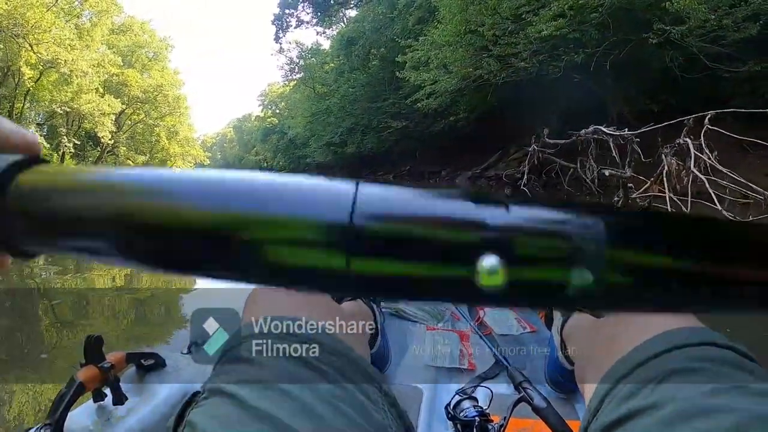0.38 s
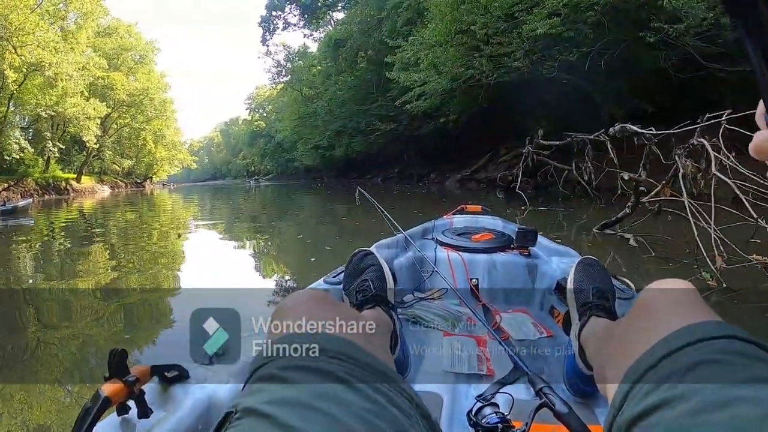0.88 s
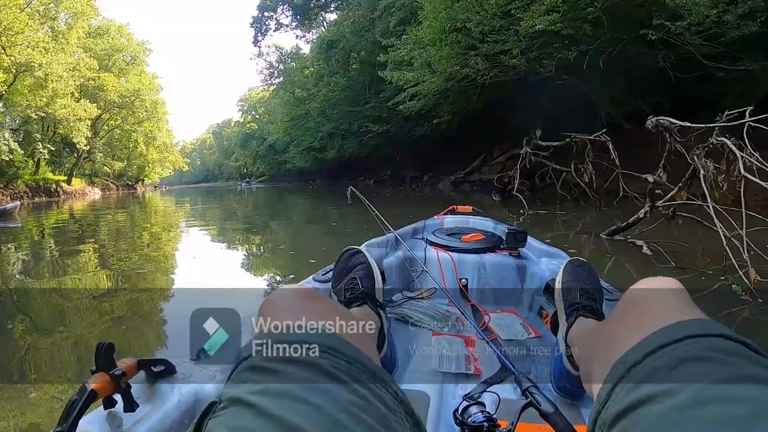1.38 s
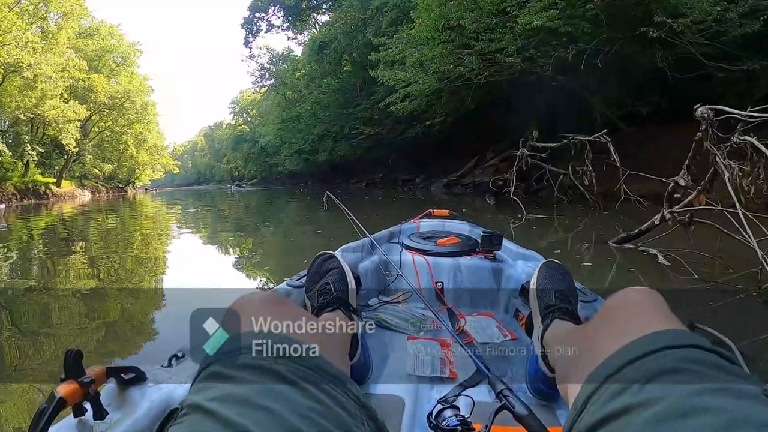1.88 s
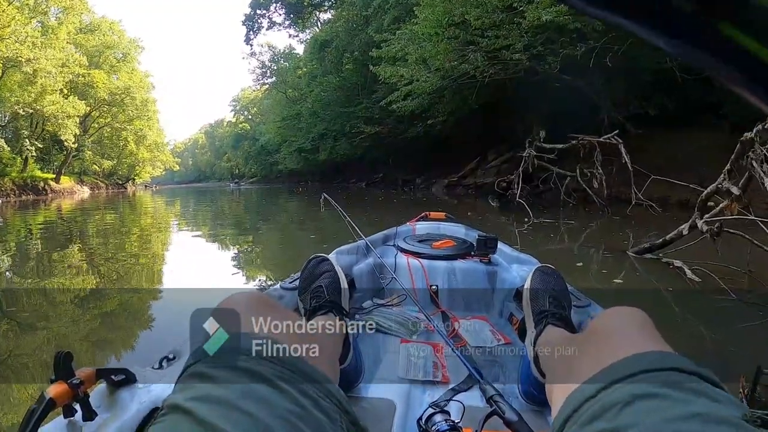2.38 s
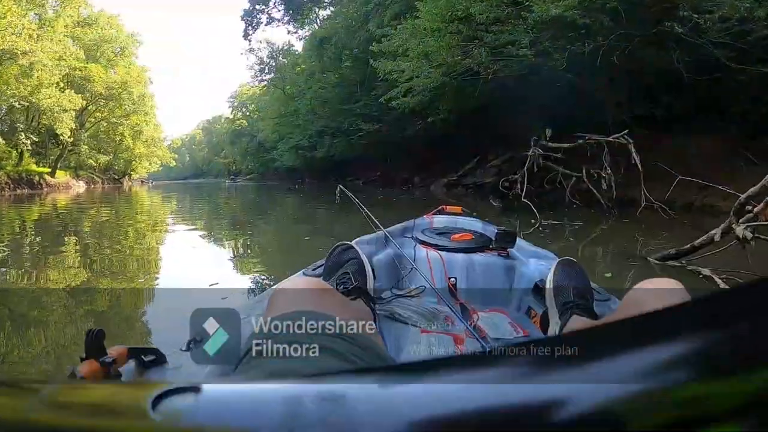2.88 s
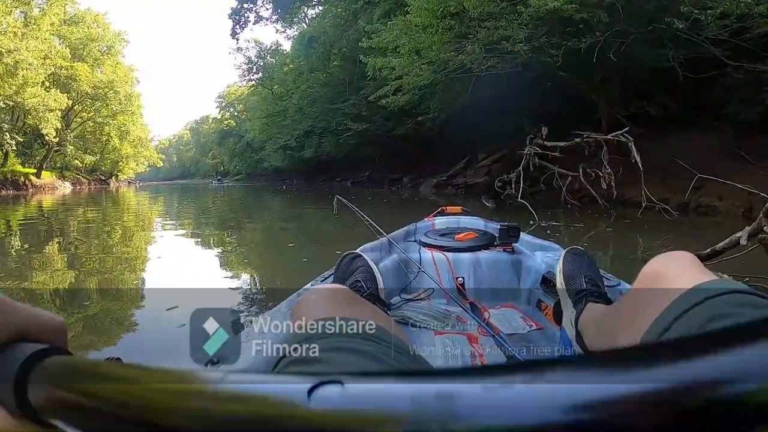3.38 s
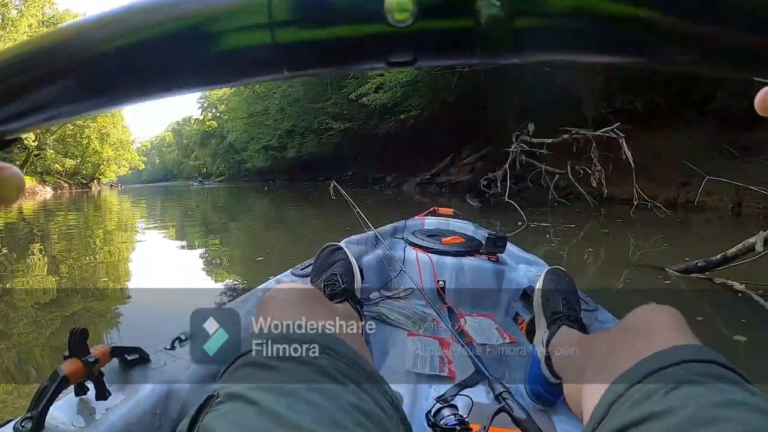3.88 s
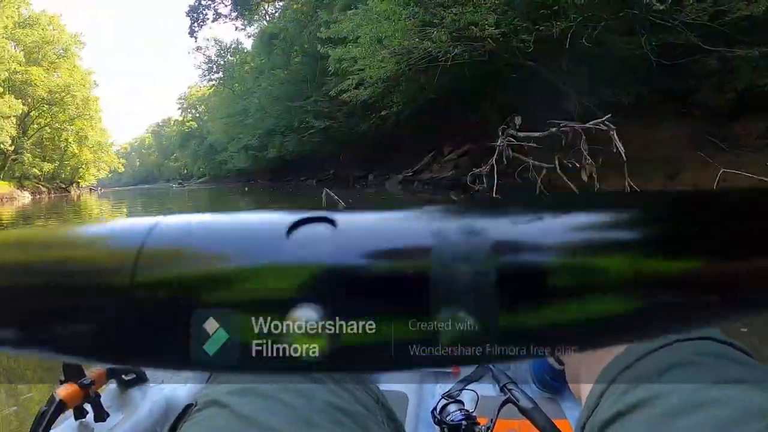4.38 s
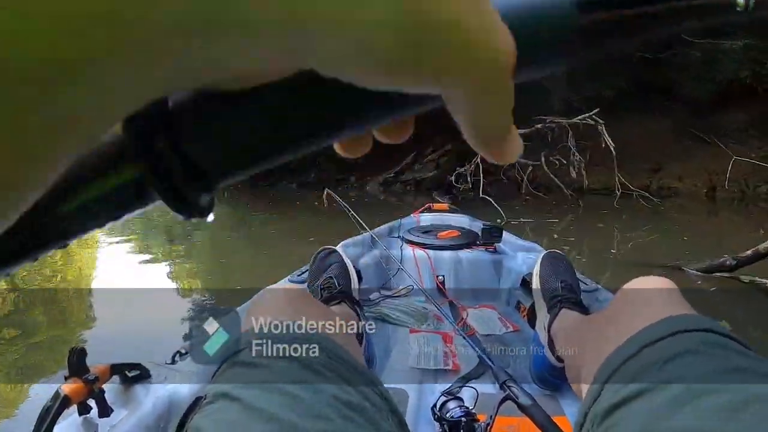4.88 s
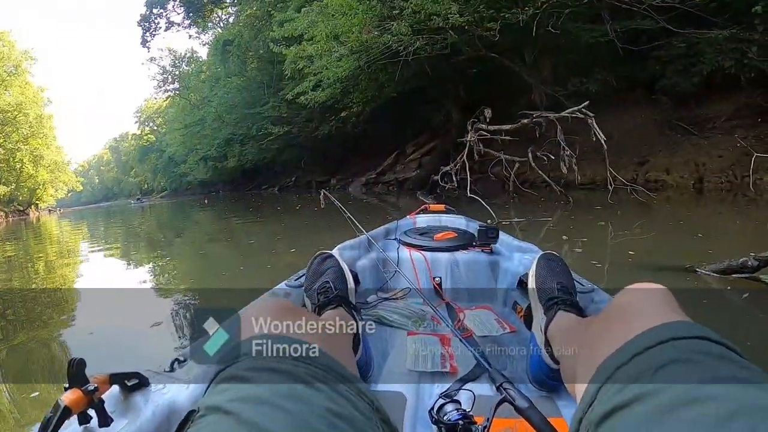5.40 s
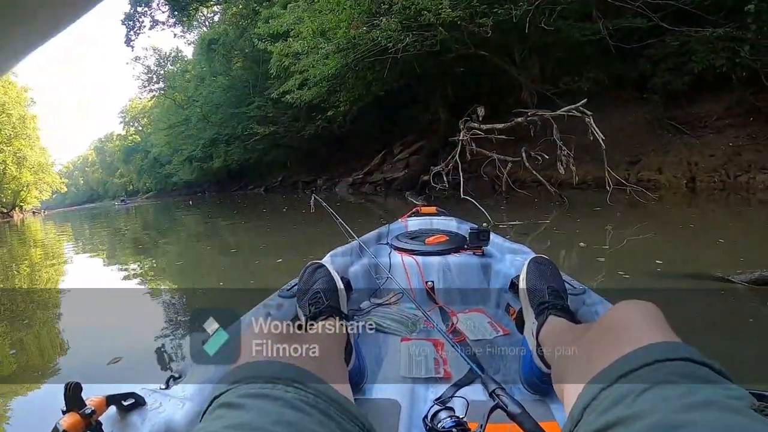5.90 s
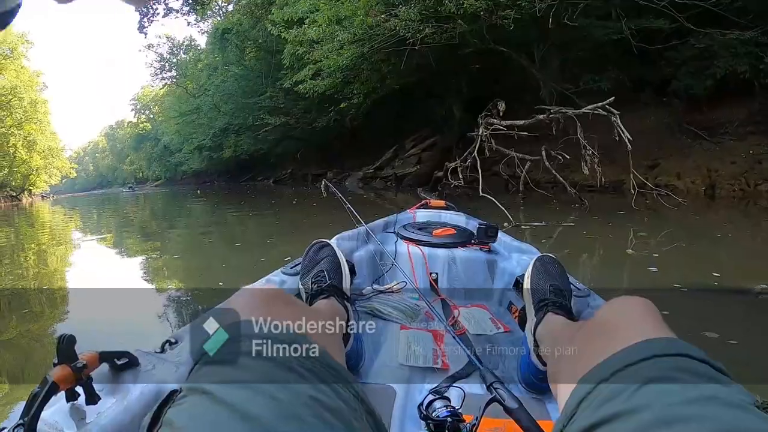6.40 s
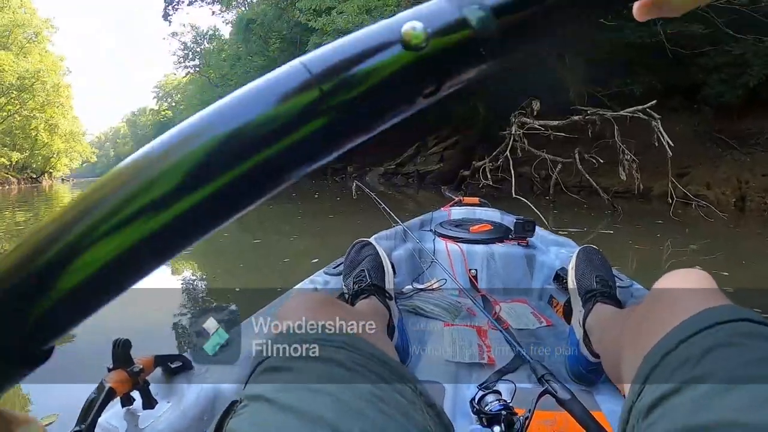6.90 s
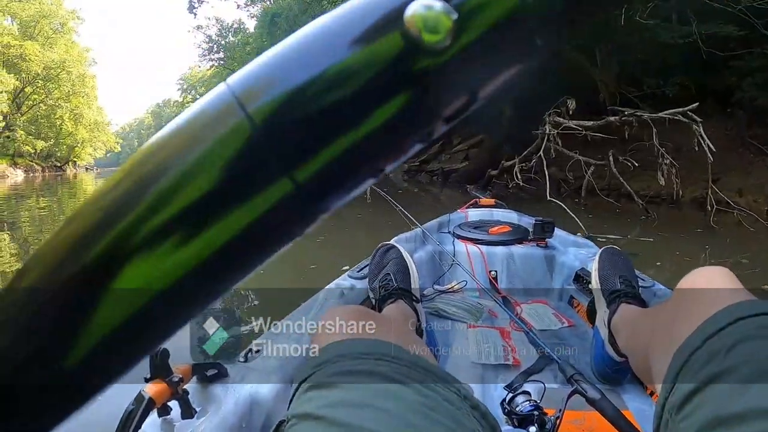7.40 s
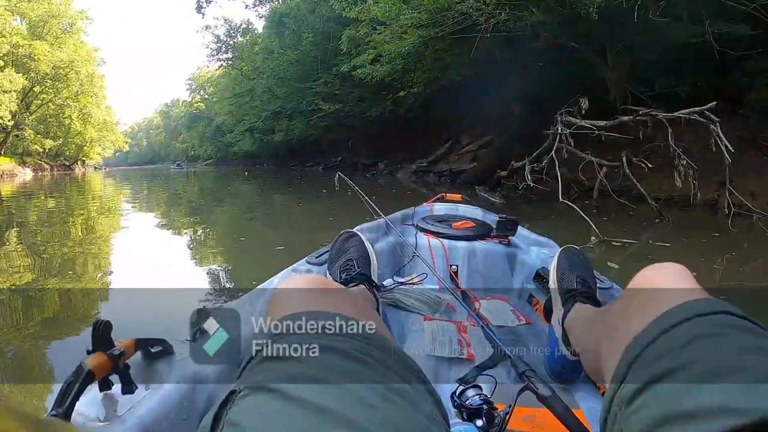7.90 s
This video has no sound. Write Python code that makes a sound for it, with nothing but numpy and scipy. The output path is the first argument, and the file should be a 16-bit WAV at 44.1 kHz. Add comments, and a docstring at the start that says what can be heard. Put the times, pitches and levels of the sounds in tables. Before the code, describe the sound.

Close stereo from a paddler's chest on a quiet river. At first there is slight cloth rustle, low water drumming and smooth insect hiss leaning left. From 1 to 2.5 s come light hull taps, soft low thumps, clear bubble plops and growing gurgles. At 2.7 s a loud hollow plastic knock lands with a swell of water, then a rapid clatter with short gritty scrapes from 3.0 to 3.5 s. Another dense burst of knocks and drags hits at 3.9-4.1 s, with rustling cloth. It calms; faint hoarse crows call around 4.5 and 5.6-6.5 s, and tiny high bird chips recur throughout. A single strong bang with a deep thump comes at 5.3 s, with tiny ticks after. At 7.1-7.3 s boomy knocks thud to the left, with a bubble; the insects drop lower, and drips and light gurgles run from 7.7 s to the end at 8 s.

```python
"""Plastic kayak on a quiet river

Heard from the paddler's chest. The shaft knocks, thumps and drags on the hull: blows and stick-slip clicks
ring decaying modes. Water gurgles, plops and fizzes as gliding bubble sines; small bumps drum the hull.
Low noise shudders with the boat, and crackling noise is the rustle of cloth.
Behind: an insect chorus of shaped noise, a small bird's pitch-swept chips and crows of fuzzy tones."""
import sys
import numpy as np
from scipy import signal
from scipy.fft import rfft
from scipy.io import wavfile
from scipy.ndimage import uniform_filter1d, map_coordinates

SR = 44100
rng = np.random.default_rng(int(sys.argv[2]) if len(sys.argv) > 2 else 0)


def attenuation_scalar(level_db):
    """Turn a level in dB into a linear amplitude multiplier (20 dB per decade)."""
    decades = np.asarray(level_db, float) / 20
    return 10 ** decades


def persist_wave(psi):
    """Save psi, clipped to +-1, as 16-bit WAV."""
    counts = np.round(np.clip(psi, -1, 1) * 32767).astype(np.int16)
    wavfile.write(sys.argv[1], SR, np.atleast_2d(counts).T)


N = 353682
T = np.arange(N) / SR  # [s]

# Hull modes: (frequency [Hz], relative level [dB], t60 before damping [s])
HULL_MODES = [(60, -10, .2), (88.4, 0, 0.27), (114.6, -3.5, 0.16), (148.6, -3.5, 0.3), (186, 6, 0.16),
              (207.2, 3.5, 0.19), (236.5, 2.5, 0.28), (264.9, 6, 0.14), (307.2, 3, 0.16), (365, 4.5, 0.13),
              (453, 4.5, 0.14), (522, -2.5, 0.14), (615.4, -2, 0.16), (720, 5.5, 0.065), (782, 3.5, 0.075),
              (975, 7.5, 0.073), (1110, 11, 0.044), (1312, 4, 0.087), (1505, 12.5, 0.02), (1752, 8, 0.047),
              (1980, 6.5, 0.043), (2214, 4, 0.051), (2412, 4.5, 0.067), (2820, 16, 0.016),
              (3150, 6.5, 0.057), (3550, 14.5, 0.034), (4110, 16, 0.046), (4540, -11, .025)]
# Hard blows of the shaft: (time [s], peak [dB], most excited frequency [Hz], tick over the blow [dB],
# spread [octaves])
KNOCKS = [(.127, -20.5, 627, -35, 0.89), (.987, -24, 580, -22, 1.5), (1.212, -28.5, 970, -18, 0.53),
          (1.487, -25.5, 684, 1.5, 1.6), (1.819, -23.5, 930, -30, 0.56), (2.009, -15.5, 1770, -28, 0.43),
          (2.234, -16, 560, -37, 0.63), (2.256, -6, 1240, -36, 0.78), (2.498, -13.5, 900, -25, 1.4),
          (2.709, -0.5, 748, -40, 1.23), (2.7113, -2.5, 1920, -30, 0.6), (2.738, -12, 1020, -30, 0.79),
          (2.899, -26, 3000, -8, 1.1), (2.983, -22, 596, -30, 0.62), (3.033, -17, 900, -30, .6),
          (3.042, -0.5, 1020, -30.5, 1), (3.069, -2.5, 730, -29.5, 0.78), (3.11, -7, 965, -35, 0.64),
          (3.141, -15.5, 1500, -19, 1.3), (3.145, -18, 3500, -21, .4), (3.353, -22, 1230, -18, 1.5),
          (3.367, -9.5, 714, -35, 1.3), (3.417, -4.5, 670, -33, 1.15), (3.453, -9.5, 920, -31, 0.73),
          (3.478, -5.5, 780, -31, 0.84), (3.872, -17.5, 1070, -16, 1.8), (3.923, -22, 985, -29, 1.2),
          (3.943, -10, 1390, -33, 1.8), (3.948, -9, 4300, -30, 0.18), (3.964, 1.5, 1040, -25, 1.25),
          (3.968, -6.5, 2400, -25, .9), (4.0, -8, 1300, -26, 1.2), (4.029, -6.5, 614, -3.5, 1.8),
          (4.059, -9, 693, -30, 1.6), (4.081, -3, 603, -28, 1.46), (4.088, -3, 524, -32, 0.6),
          (4.734, -30.5, 519, -10, 0.96), (4.992, -23.5, 2580, -6.5, 1.8), (5.278, -1, 860, -14, 0.78),
          (5.2778, -0.5, 2060, -39.5, 0.38), (5.333, -18.5, 594, -14, 1.6), (5.578, -28, 2900, -12, 1.8),
          (5.867, -33, 1380, -15, 1.2), (6.292, -20, 820, -3.5, 1.8), (6.648, -31, 1050, -19, 0.67),
          (6.683, -23.5, 2660, -8, 0.66), (7.003, -28.5, 988, -1.5, 1.2), (7.108, -20.5, 900, -20, 1.3),
          (7.118, -2, 1010, -15.5, .96), (7.15, -24.5, 576, -16, 1.8), (7.185, -11, 649, -28, 1.08),
          (7.226, -18.5, 800, -32, 1.4), (7.289, -22.5, 501, -29, 1.6), (7.481, -23.5, 504, -28, 1.9)]
# Soft, deep blows: (time [s], peak [dB], most excited frequency [Hz], spread [octaves])
THUMPS = [(1.211, -23, 335, .32), (1.497, -15.5, 186, 0.28), (1.519, -16.5, 217, 0.51),
          (1.567, -16, 202, 0.43), (1.668, -25, 242, 0.23), (1.7, -15.5, 244, 0.11),
          (1.805, -15, 241, 0.11), (2.182, -16, 223, 0.31), (2.329, -11.5, 194, 0.21),
          (2.349, -14, 206, 0.13), (2.714, -23, 151, .13), (2.716, -12, 327, .39), (2.734, -8, 178, 0.1),
          (2.759, -1.5, 194, 0.45), (2.79, -6.5, 160, 0.25), (2.958, -14.5, 334, 0.29),
          (3.066, -13.5, 280, 0.12), (3.376, -15, 263, 0.094), (3.515, -18.5, 261, 0.12),
          (3.982, -13.5, 150, 0.11), (4.03, -10.5, 142, 0.2), (4.063, -14, 303, .33), (4.08, -8, 414, 0.41),
          (4.113, -20.5, 91.5, 0.43), (4.761, -27, 186, 0.09), (5.281, 0, 192, .37),
          (5.282, -9.5, 365, 0.21), (5.3, -15, 187, 0.27), (5.333, -16.5, 120, 0.22),
          (5.573, -19.5, 96, 0.45), (5.585, -24.5, 272, 0.46), (6.295, -24, 167, 0.24),
          (6.401, -23, 194, 0.49), (7.107, -12, 210, 0.082), (7.12, .5, 184, 0.12), (7.15, -6.5, 255, 0.51),
          (7.187, 0.5, 199, 0.09), (7.212, -4, 175, .2), (7.286, -8, 159, 0.5), (7.588, -28.5, 333, 0.2),
          (7.995, -24.5, 312, 0.15)]
# Shaft dragging over the hull: (start [s], length [s], relative level [dB],
# first brightness, last brightness [octaves above the dullest spot])
DRAGS = [(3.04, 0.068, -20, 2, 0.54), (3.119, 0.053, -26.5, 0.46, 1.2), (3.272, .06, -34, 1.6, 1.8),
         (3.364, 0.027, -16.5, 0.91, 0.51), (3.438, .09, -19.5, 1.4, 0.85), (3.62, .13, -30, 0.47, 1.3),
         (3.941, .035, -16, 2.1, 1.5), (3.982, 0.056, -11, 0.84, 0.35), (4.043, 0.044, -14, 0.63, 0.78)]
# Single bubbles: (time [s], level [dB], starting pitch [Hz], t60 [s], rough initial rise [octaves/s])
PLOPS = [(1.047, -2.5, 1210, 0.017, 4), (1.304, -14.5, 1194, 0.044, 2.9), (1.342, -15.5, 490, 0.04, 4),
         (1.406, -25.5, 1170, 0.053, 4), (1.448, -18.5, 458, 0.034, 4), (1.515, -20.5, 740, 0.048, 3.3),
         (1.724, -11, 894, 0.026, 3.5), (1.751, 0, 610, 0.015, 4), (1.978, -22.5, 956, 0.093, 3.9),
         (2.885, -32, 970, 0.04, 4), (6.493, -27, 1135, 0.035, 4), (6.954, -30.5, 990, 0.035, 4),
         (7.765, -9, 990, 0.023, 4), (7.797, -15, 996, 0.032, 4), (7.817, -12, 1084, 0.037, 4),
         (7.9, -19, 1020, 0.044, 3.6), (7.916, -21, 1580, 0.041, 3.1), (1.104, -22, 736, 0.13, 21),
         (1.359, -25.5, 558, 0.11, 18), (2.564, -32, 468, 0.12, 36), (7.233, -5.5, 727, 0.065, 29),
         (7.687, -22.5, 975, 0.07, 18), (7.829, -19.5, 485, 0.1, 16.4), (1.0251, -22, 3150, 0.022, 14),
         (1.1467, -16, 3750, 0.018, 8), (1.276, -23.5, 3550, 0.032, 8), (1.5404, -24.5, 1980, 0.045, 10),
         (1.9624, -23, 1650, 0.019, 8), (2.5132, -18, 2780, 0.039, 9.1), (7.7273, -27, 1610, 0.019, 9.7),
         (7.95, -23, 2050, 0.022, 7.2)]
# Surges of water round the blade: (peak time [s], gurgle level [dB], swell [s], fade [s],
# depth [0 surface - 1 against the hull])
SURGES = [(.06, -41, 0.39, 0.3, 0.69), (.3, -48.5, 0.62, 1.44, 0.91), (1.1, -33.5, 0.32, 0.37, 0.38),
          (1.45, -36.5, 0.45, 1.2, 0.34), (1.8, -29, 0.23, 0.6, 0.5), (2.0, -34, 0.4, 0.095, 0.64),
          (2.25, -30, 0.19, .3, 0.53), (2.53, -34, 0.18, .4, .03), (2.62, -23.5, 0.11, 0.3, 0.082),
          (2.701, -22, 0.31, 0.027, 0.16), (2.729, -20.5, .03, .11, 0.68), (2.971, -29, 0.2, 0.24, 0.39),
          (3.57, -43.5, 0.64, 0.3, 0.76), (6.45, -53, 0.3, 0.23, 0.54), (7.2, -33, 0.12, .16, 0.82),
          (7.47, -43, 0.25, 1.1, 0.33), (7.76, -33, 0.17, 0.59, 0.17), (8.02, -34, 0.43, .5, 0.078)]
# Low shudder of the boat at rest: (time [s], level [dB])
REST_SHUDDER = [(0, -42.5), (.3, -43.5), (7.1, -43), (7.4, -47.5), (8.02, -52)]
# The boat rocks: (peak time [s], level [dB], swell [s], fade [s])
LURCHES = [(.36, -39, 0.1, .2), (1.0, -43, .12, .16), (2.77, -33, 0.097, 0.18), (4.0, -37, .08, .2),
           (4.13, -28.5, 0.25, 0.09), (5.3, -26.5, 0.074, .17), (7.2, -24.5, 0.14, .2)]
# Colour of the shudder: (frequency [Hz], relative density [dB per Hz])
SHUDDER_COLOUR = [(15, -4), (60, -5), (110, -2), (200, -17.5), (350, -25)]
# Where the near sounds are: (time [s], delay of the left [samples], left over right [dB])
NEAR_PLACE = [(0, 4.5, -1), (1, 3.5, -1.5), (2.5, 3, -2.5), (4.2, 4, 0.5), (4.6, 5.5, 3), (6.9, 7, -0.5),
              (7.1, -4, 9), (7.4, -3.5, 7), (8, -4, 11.5)]
# Cloth movements: (peak time [s], level above 9 kHz [dB], swell [s], fade [s])
RUSTLES = [(0.001, -49.5, .05, 0.042), (.35, -53, 0.06, 0.13), (2.71, -56.5, 0.73, .006),
           (3.54, -59.5, 0.92, 0.056), (4.024, -45, 0.16, 0.11), (5.598, -51, 0.02, 0.014),
           (8.0, -56, 0.49, .3)]
# Colour of the cloth: (frequency [Hz], relative density [dB per Hz])
CLOTH_COLOUR = [(400, -58), (1800, -5), (3000, 1), (8000, -13.5), (12000, -19.5), (15500, -21.5)]
# Insect chorus level, lower for a moment after the blow at 2.7 s and from 7.2 s to the end:
# (time [s], level [dB])
CHORUS_LEVEL = [(0.0, -45), (0.87, -43), (2.57, -44), (2.72, -48.5), (3.88, -44.5), (5.65, -47), (6.1, -45),
                (6.92, -44.5), (7.24, -54.5), (8.02, -53.5)]
# Colour of the chorus: (frequency [Hz], relative density [dB per Hz])
CHORUS_COLOUR = [(210, -69), (350, -4.5), (820, -17.5), (1290, -5.5), (1830, -15.5), (3030, -0.5),
                 (3780, 2), (5020, -0.5), (5790, 3), (7930, -7), (9140, -21), (12300, -28.5), (13800, -31),
                 (15100, -67)]
# Stereo likeness of the chorus, held within 0-1: (frequency [Hz], left-right likeness [0-1])
CHORUS_LIKENESS = [(60, 0.87), (240, -0.6), (940, 0.38), (3710, 0.56), (14700, -0.081)]
# Stereo lean of the chorus: (frequency [Hz], left over right [dB])
CHORUS_LEAN = [(60, 1.0), (240, 0.5), (940, 2.4), (3710, 5.6), (14700, 3.1)]
# Stereo phase of the chorus: (frequency [Hz], lead of the left [radians])
CHORUS_LEAD = [(0, -48), (860, 7.5), (2760, 20), (4100, -10), (4800, -38.5), (8300, -9.5)]
# Bird chips: (time [s], level [dB])
CHIPS = [(0.4514, -42), (1.295, -40), (2.0762, -40.5), (4.3929, -40), (5.247, -35.5), (6.3225, -35.5),
         (7.857, -35.5)]
# Pitch path of one chip: (time [s], pitch [Hz])
CHIP_PITCH = [(0, 6100), (.006, 7460), (.011, 7800), (.018, 7400)]
# Far crows: (start [s], length [s], level at the end of the caw [dB], throat pitch [Hz],
# glide over the caw [Hz])
CAWS = [(0.782, 0.18, -50.5, 1285, -53), (4.469, 0.42, -57, 1407, -280), (5.648, .13, -55.5, 1310, 34),
        (5.918, .18, -55.5, 1223, 65), (6.371, 0.19, -54, 1607, 80)]

# A heavier blow presses on the hull and damps it: factor on t60 at 0 dB, and its gain for each dB less.
KNOCK_RING, THUMP_RING, RING_PER_DB = 0.54, 0.61, 0.0162
RING_PER_OCTAVE = 0.075  # brighter knocks die sooner: the factor falls by this per octave over 800 Hz
GRIP_S, LIFT_S = .006, .022  # a drag gains 20 dB before its start, loses 20 dB after its end in these times
# Deep surges drum the hull, shallow ones fizz: dB over the gurgle at the surface and at full depth.
DRUM_DB, DRUM_DEEP_DB, FIZZ_DB, FIZZ_DEEP_DB = -14.5, 19.5, -3.5, -16.5
LAP_DRUM_DB, LAP_GURGLE_DB, LAP_FIZZ_DB = -59.5, -62.5, -56.5  # calm water between strokes
CAW_FADE_DB = -4.5  # change over one caw


def ring(focus_hz, octaves, rise_s, damping, phase=0):
    """The hull's decaying modes, strongest near where the blow puts its energy; peak 1."""
    hz, db, t60 = np.transpose(HULL_MODES)[:, :, None]
    t = np.arange(SR // 4) / SR
    place_db = -6 * (np.log2(hz / focus_hz) / max(octaves, .1)) ** 2
    decay = attenuation_scalar(db + place_db - 60 * t / (t60 * damping))
    modes = decay * np.sin(2 * np.pi * (hz * t + phase))  # phase in turns
    sound = modes.sum(0) * (1 - np.exp(-t / rise_s))
    return sound / abs(sound).max()


def knocks():
    """Hard blows ring the hull, each from another spot (random mode phases), with a brief noisy tick."""
    mix, t = np.zeros((2, N)), np.arange(1024) / SR
    tick_band = signal.butter(2, [2600., 8500.], "band", fs=SR, output="sos")
    grit = signal.sosfilt(tick_band, rng.standard_normal((len(KNOCKS), 3, 1024)))
    spots = rng.random((len(KNOCKS), len(HULL_MODES), 1))
    for (s, db, hz, tick_db, octaves), hiss, phase in zip(KNOCKS, grit, spots):
        damping = KNOCK_RING - RING_PER_DB * db - RING_PER_OCTAVE * np.log2(hz / 800)
        add(mix, s, attenuation_scalar(db) * ring(hz, octaves, 0.0002, damping, phase))
        tick_shape = attenuation_scalar(db + tick_db - 60 * t / 0.022) * (1 - np.exp(-t / 0.0012))
        tick = (hiss[0] + 2.28 * hiss[1:]) * tick_shape  # one shared noise, one per side
        mix[:, round(s * SR):][:, :1024] += tick
    return mix


def thumps():
    """Soft blows swell more slowly, in the hull's low modes."""
    mix = np.zeros((2, N))
    for s, db, hz, octaves in THUMPS:
        damping = THUMP_RING - RING_PER_DB * db
        add(mix, s, attenuation_scalar(db) * ring(hz, octaves, 0.0018, damping), .8)
    return mix


def drags():
    """Uneven stick-slip clicks run into the hull; the contact moves between dull and bright spots."""
    mix, spots_hz = np.zeros((2, N)), np.geomspace(350, 3600, num=6)
    spot_octaves = np.log2(spots_hz / spots_hz[0])[:, None]
    for start, length, db, first, last in DRAGS:
        t = np.arange(-GRIP_S, length + LIFT_S, 1 / SR)
        clicks = rng.random((6, len(t))) < 280. / SR  # 280 slips per second at each spot
        slips = clicks * attenuation_scalar(3.7 * rng.standard_normal((6, len(t))))
        brightness = np.interp(t, [0, length], [first, last])
        near = attenuation_scalar(-6. * (brightness - spot_octaves) ** 2)
        press_db = db - 20 * np.maximum(0, np.maximum(-t / GRIP_S, (t - length) / LIFT_S))
        force = slips * near / np.sqrt((near ** 2).sum(0)) * attenuation_scalar(press_db)
        for spot_force, spot_hz in zip(force, spots_hz):
            body = ring(spot_hz, 0.98, 0.0008, 0.4, rng.random((len(HULL_MODES), 1)))
            body = body / np.linalg.norm(body)
            add(mix, start - GRIP_S, attenuation_scalar(17.5) * signal.fftconvolve(spot_force, body))
    return mix


def bubble(hz, t60, rise):
    """A dying sine whose pitch climbs, fast and then slower, as the bubble nears the surface."""
    t = np.arange(round(max(t60, .005) * SR)) / SR
    climb_octaves = rise * 0.0262 * (1 - np.exp(-t / 0.027))
    turns = np.cumsum(hz * 2 ** climb_octaves) / SR
    return attenuation_scalar(-60 * t / t60) * (1 - np.exp(-t * hz * 2)) * np.sin(2 * np.pi * turns)


def grains(templates, per_s, uneven_db, apart):
    """Each template on its own sparse train of uneven clicks, a little left or right; overall rms 1."""
    mix = np.zeros((2, N))
    for shape in templates:
        at = rng.integers(0, N, round(per_s * N / SR / len(templates)))
        strength = attenuation_scalar(uneven_db * np.minimum(rng.exponential(1, len(at)), 4))
        train = np.zeros(N)
        train[at] = strength * rng.choice([-1, 1], len(at))
        pan = attenuation_scalar(apart * rng.uniform(-0.68, 1) * np.array([[1], [-1]]))
        mix += signal.oaconvolve(train, shape)[:N] * pan
    return mix / mix.std()


def stirred(calm_db, top_db=0, deep_db=0):
    """Gain of one water layer: calm lapping plus its share of each surge, set by the surge's depth."""
    rows = [(s, db + top_db + (deep_db - top_db) * depth, swell, fade)
            for s, db, swell, fade, depth in SURGES]
    return np.sqrt(attenuation_scalar(calm_db) ** 2 + humps(rows))


def plops():
    """Single bubbles, each a rising sine that dies away."""
    mix = np.zeros((2, N))
    for s, db, hz, t60, rise in PLOPS:
        add(mix, s, attenuation_scalar(db) * bubble(hz, t60, rise))
    return mix


def drumming():
    """Water drums the hull: many small bumps that ring its low modes."""
    bumps = [ring(hz, 0.37, 0.0028, 0.76) for hz in np.geomspace(140, 380, num=6)]
    return grains(bumps, 250, 1.35, 3.5) * stirred(LAP_DRUM_DB, DRUM_DB, DRUM_DEEP_DB)


def gurgle():
    """Crowds of mid-sized bubbles, bigger ones lower and longer."""
    bubbles = [bubble(hz, 36 / hz, 13.4) for hz in np.geomspace(420, 1700, num=20)]
    return grains(bubbles, 700, 4.17, 3.0) * stirred(LAP_GURGLE_DB)


def fizz():
    """Dense swarms of tiny, high and short bubbles; for the same gurgle, shallow surges fizz more."""
    bubbles = [bubble(hz, 30 / hz, 10.5) for hz in np.geomspace(1700, 5200, num=16)]
    return grains(bubbles, 3200, 4.6, 10.0) * stirred(LAP_FIZZ_DB, FIZZ_DB, FIZZ_DEEP_DB)


def rumble():
    """Lumpy low noise, nearly alike in both ears, that swells as the boat rocks."""
    x = noise(SHUDDER_COLOUR + [(600, -70), (SR / 2, -120)], 1.8, 0.94)
    rocking = humps(LURCHES)
    return x / amp_of_band(x, 20, 75) * np.sqrt(level(REST_SHUDDER) ** 2 + rocking)


def cloth():
    """Fabric close to the microphone crackles: noise in clumps of 64 samples, swelling with each movement."""
    clumps = attenuation_scalar(3.1 * np.repeat(rng.standard_normal(N // 64 + 1), 64)[:N])
    x = noise(CLOTH_COLOUR, 3.0, 0.35, -2.) * clumps
    moving = np.sqrt(humps(RUSTLES))
    return x / amp_of_band(x, 9000, 14000) * moving


def chorus():
    """Smooth far insect hiss over the air of the river, leaning left."""
    x = noise([(60, -64)] + CHORUS_COLOUR, 1.75, CHORUS_LIKENESS, CHORUS_LEAN, CHORUS_LEAD)
    return x / amp_of_band(x.mean(0), 4500, 7000) * level(CHORUS_LEVEL)


def bird():
    """Chips: a sine swept mostly upward, with a short noisy echo off the bank."""
    mix, t = np.zeros((2, N)), np.arange(round(CHIP_PITCH[-1][0] * SR)) / SR
    turns = np.cumsum(np.interp(t, *np.transpose(CHIP_PITCH))) / SR
    chip = np.sin(2 * np.pi * turns) * signal.windows.tukey(len(t), .6)
    echo_t = np.arange(SR // 8) / SR
    echo = rng.standard_normal(SR // 8) * attenuation_scalar(-38.0 - 60 * echo_t / 0.61)
    echo[0] = 1  # the direct sound
    for s, db in CHIPS:
        add(mix, s, attenuation_scalar(db) * signal.fftconvolve(chip, echo), 6.)
    return mix


def crows():
    """Hoarse caws blurred by distance: a gliding tone whose strength and phase waver with slow noise."""
    mix, blur = np.zeros((2, N)), round(SR / 500.)
    for s, length, db, hz, glide_hz in CAWS:
        t = np.arange(0, length, 1 / SR)
        fuzz = [1, 1j] @ rng.standard_normal((2, len(t)))
        for _ in range(2):
            fuzz = uniform_filter1d(fuzz.real, blur) + 1j * uniform_filter1d(fuzz.imag, blur)
        turns = np.cumsum(hz + glide_hz * t / length) / SR
        caw = ((fuzz / fuzz.std() + 0.44) * np.exp(2j * np.pi * turns)).real
        fading = attenuation_scalar(db + CAW_FADE_DB * (t / length - 1.0)) * signal.windows.tukey(len(t), .2)
        add(mix, s, caw / caw.std() * fading, 3.)
    return mix


def noise(spectrum, patchy_db, same, lean_db=0, lead=0):
    """Two channels of random short-time spectra with drifting patches."""
    hz = np.fft.rfftfreq(1024, 1 / SR)
    a, b, c, d, patches = rng.standard_normal((N // 256 + 5, 513, 5)).T
    patches = uniform_filter1d(uniform_filter1d(patches, size=10, axis=0), size=8, axis=1)

    def column(v):
        """A curve or a constant as one value per frequency bin."""
        return (read(v, hz) if np.ndim(v) else v * np.ones(513))[:, None]

    same, left = np.clip(column(same), 0, 1), a + 1j * b
    right = same * left * np.exp(-1j * column(lead)) + np.sqrt(1 - same ** 2) * (c + 1j * d)
    lean = attenuation_scalar(column(lean_db) / 2)
    z = np.array([left * lean, right / lean])
    z *= attenuation_scalar(column(spectrum) + patchy_db * patches / patches.std())
    return signal.istft(z, nperseg=1024, noverlap=768)[1][:, :N]


def humps(rows):
    """Events that swell to a peak and fade, 20 dB in the given times, as summed power per sample."""
    power = 0
    for s, db, swell, fade in rows:
        away = np.maximum((s - T) / max(swell, .003), (T - s) / max(fade, .003))
        power = power + attenuation_scalar(2 * db - 40 * away)  # doubled dB gives power
    return power


def amp_of_band(x, lo_hz, hi_hz):
    """Rms of x inside a band."""
    z, hz = rfft(x), np.fft.rfftfreq(x.shape[-1], 1 / SR)
    inside = z[..., (hz > lo_hz) & (hz < hi_hz)]
    return np.sqrt(2 * np.mean(np.sum(abs(inside) ** 2, -1))) / x.shape[-1]


def read(points, hz):
    """Reads a curve on a log-frequency axis."""
    f, value = np.transpose(points)
    return np.interp(np.log(hz + 1), np.log(f + 1), value)


def level(rows):
    """A dB curve as gain per sample."""
    return attenuation_scalar(np.interp(T, *np.transpose(rows)))


def add(mix, s, sound, pan_db=0):
    """Places a sound in time and between left and right (positive pan is left)."""
    part = mix[:, round(s * SR):][:, :len(sound)]
    part += sound[:part.shape[1]] * attenuation_scalar(np.array([[pan_db / 2], [-pan_db / 2]]))


def scene():
    """Near sounds are panned to where the paddle is, their bass comes from the whole hull; far ones surround."""
    s, lag, pan_db = np.transpose(NEAR_PLACE)
    pan = attenuation_scalar(np.interp(T, s, pan_db) * np.array([[.5], [-.5]]))
    paddle = knocks() + plops() + gurgle() + fizz() + drags()
    near = paddle * pan + thumps() + drumming() + rumble()
    # the left ear hears all near sound later, or earlier where the lag is negative
    near[0] = map_coordinates(near[0], [np.arange(N) - np.interp(T, s, lag)], order=3)
    return near + cloth() + chorus() + bird() + crows()


def low_pass(x):
    """Removes everything above the highest recorded frequency."""
    return signal.sosfilt(signal.butter(12, 15280, fs=SR, output="sos"), x)


def record(dry):
    """The microphone drops the deepest bass and the top; the loudest peaks are rounded off."""
    mic_band = signal.butter(2, [26., 11000.], "band", fs=SR, output="sos")
    band = signal.sosfilt(mic_band, dry)
    mix = 1.041 * np.tanh(band / 1.1)
    return low_pass(mix)


dry = scene()
out = record(dry)
persist_wave(out)
```